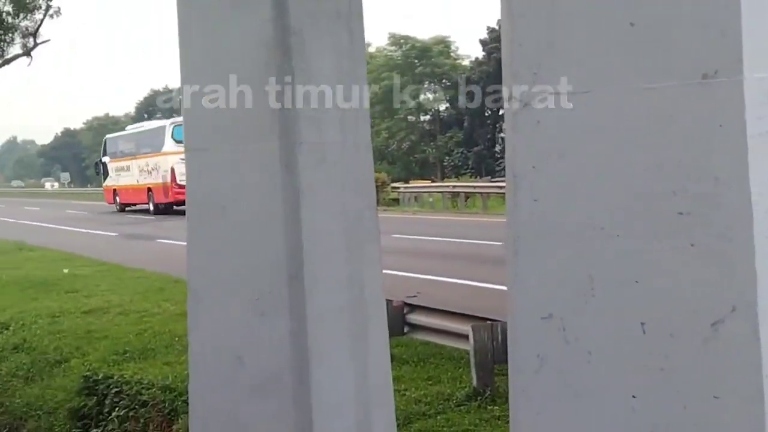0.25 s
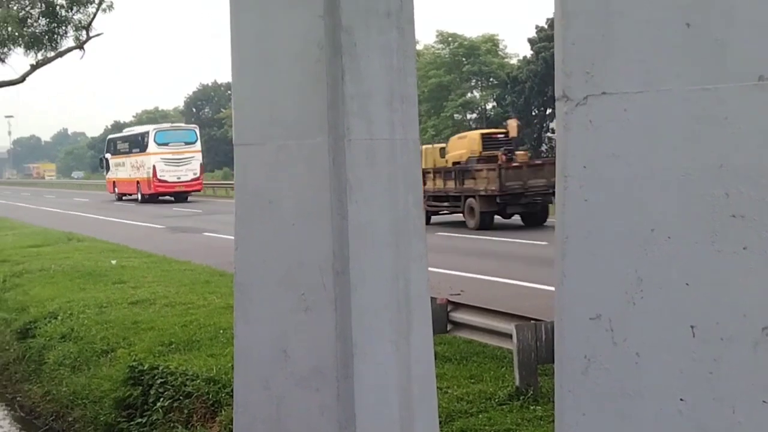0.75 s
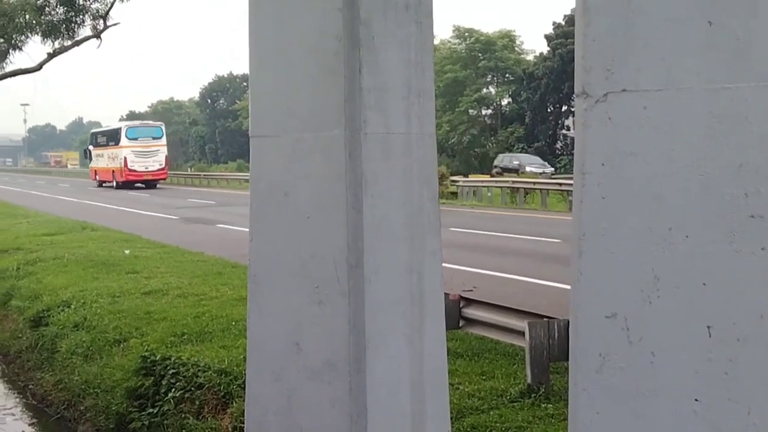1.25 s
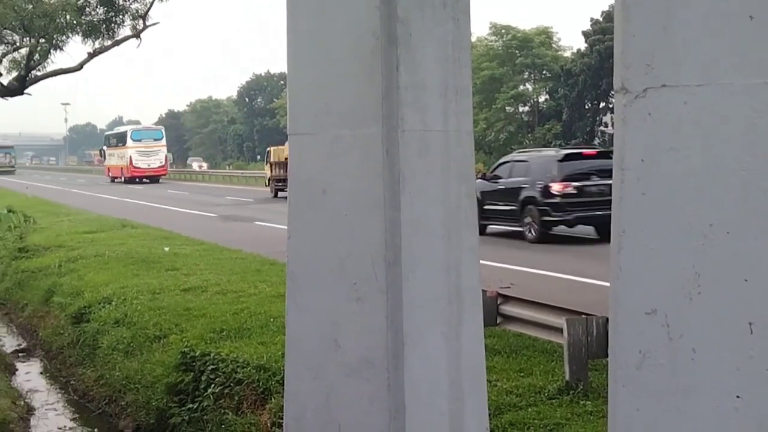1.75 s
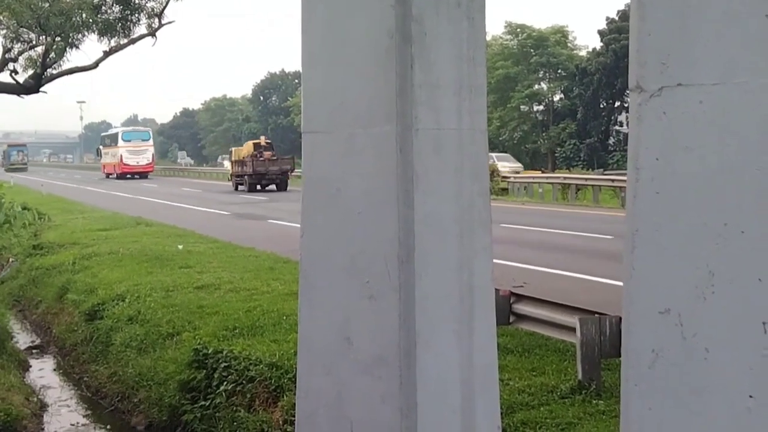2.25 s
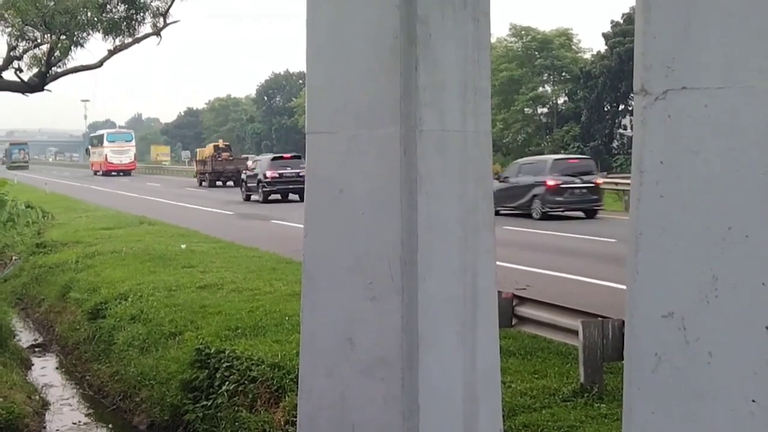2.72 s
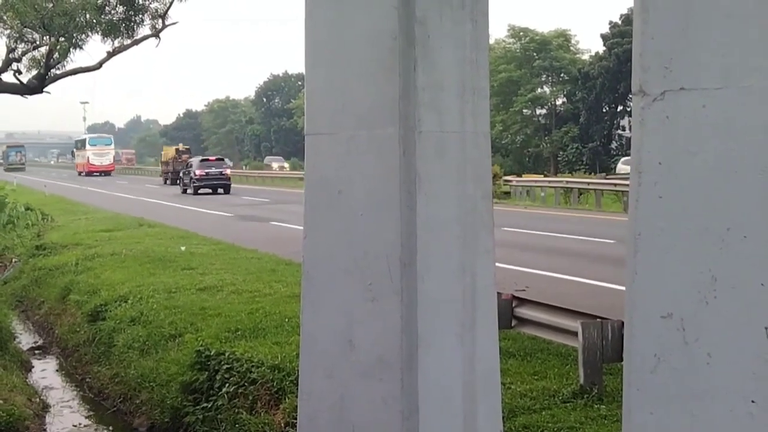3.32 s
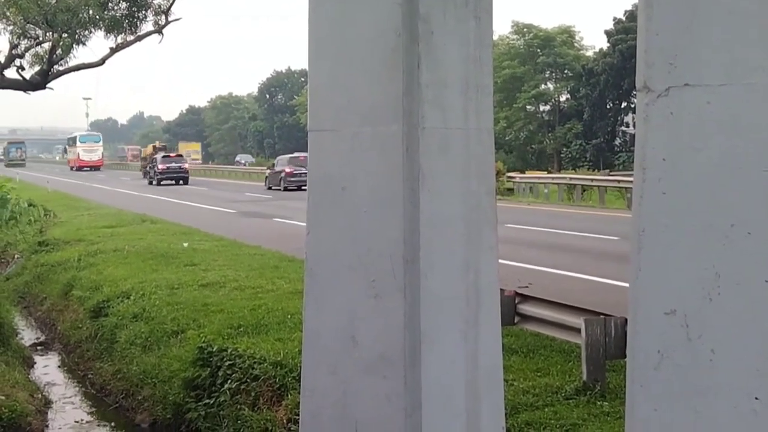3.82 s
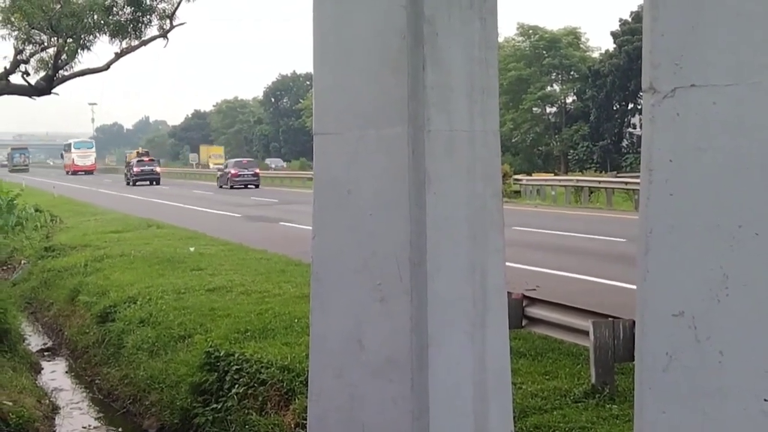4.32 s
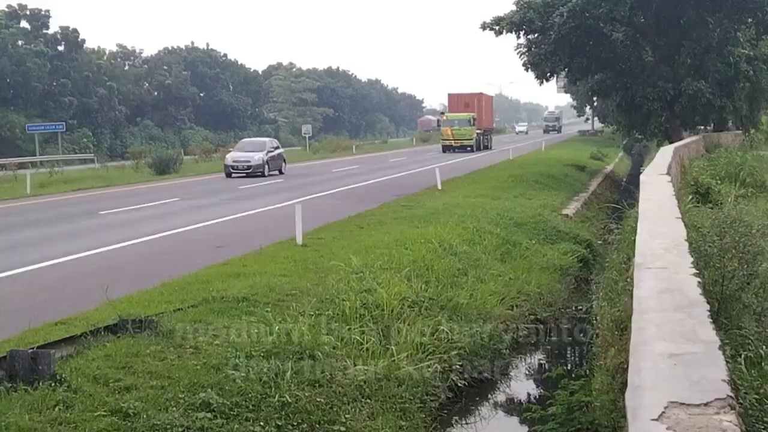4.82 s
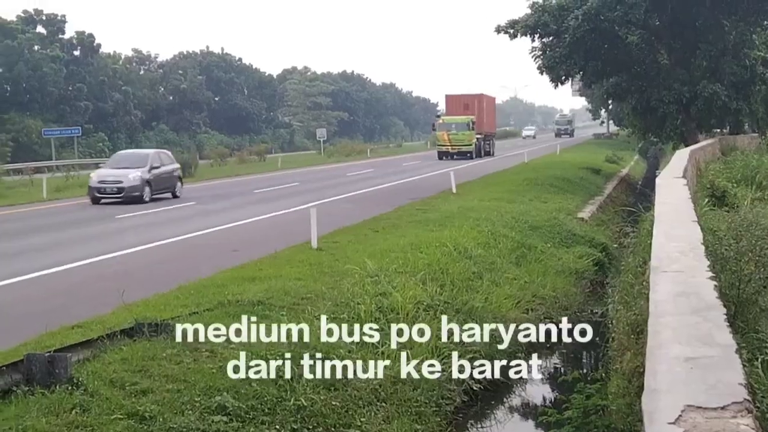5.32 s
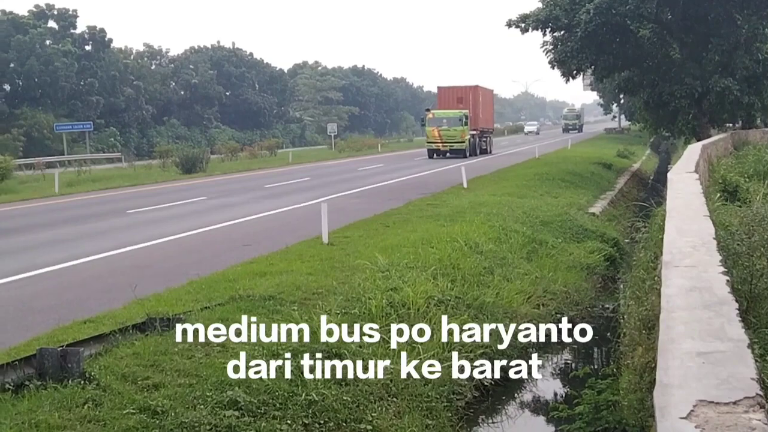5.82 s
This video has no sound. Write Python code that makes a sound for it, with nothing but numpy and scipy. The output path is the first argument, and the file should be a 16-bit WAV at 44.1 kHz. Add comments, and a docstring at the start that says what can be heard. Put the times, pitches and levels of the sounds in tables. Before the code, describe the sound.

Highway traffic sweeps by with tyre roar and falling whines, cuts off briefly, then returns as a car closes in.

```python
"""Traffic beside a busy toll road

A small diesel truck and two cars sweep past and draw away into the stream of traffic.
After a short silence, from a second spot on the verge, a car closes in ahead of more distant traffic.
Tyres roar and sing in whines that mostly sink as they pass, air hisses from the grooves,
engines and bodies rumble."""
import sys
import numpy as np
from scipy import signal
from scipy.fft import rfft, irfft
from scipy.io import wavfile
from scipy.ndimage import uniform_filter1d, map_coordinates

SR = 44100
rng = np.random.default_rng(int(sys.argv[2]) if len(sys.argv) > 2 else 0)


def store_wav(level_fs):
    """Save 16-bit WAV to argv[1]."""
    pcm = np.round(np.clip(np.atleast_2d(level_fs), -1, 1) * 32767)
    wavfile.write(sys.argv[1], SR, pcm.T.astype(np.int16))


N = 267687
TIME, FREQ = np.arange(N) / SR, np.maximum(np.fft.rfftfreq(N, 1 / SR), 1)
CUT_S, RESUME_S = 4.817, 5.06  # the silence between the two spots

# road noise close by, far off and closing in, and the finest hiss: (frequency [Hz], relative level [dB])
CLOSE_EQ = [(18, -54), (30, -25), (101, -7.5), (150, -8), (200, -7), (275, -9.5), (404, -7.5), (818, 0.5),
            (1070, -3.5), (1400, -0.5), (3040, -13), (4940, -15), (6150, -25), (7840, -25.5), (10000, -54),
            (13000, -80), (22000, -120)]
FAR_EQ = [(18, -56), (30, -18.5), (63, -5.5), (140, -0.5), (205, -1.5), (310, -6.5), (480, -9), (688, -3),
          (794, -3.3), (1490, -3), (3450, -16.5), (4610, -16.5), (6160, -26.5), (7830, -30.5), (8630, -35),
          (9500, -73), (12400, -90.5), (20900, -120)]
NEARING_EQ = [(30, -28.5), (72, -8.5), (150, -9), (215, -15), (290, -12.5), (490, -14.5), (780, -8.5),
              (1100, -7.5), (1400, -3.5), (2000, -8), (2600, -8.5), (4300, -24.5), (6300, -27),
              (7600, -37.5), (10000, -49.5), (14000, -60.5)]
SIZZLE_EQ = [(7000, -19.5), (8500, 8), (10500, -2.5), (12500, -2), (14000, -6), (16000, -7.5)]
# steady humps and dips in the hiss at the first spot: (centre [Hz], width [Hz], gain [dB])
HISS_BELLS = [(4240, 590, -2), (4680, 500, -0.5), (6250, 900, 0), (7900, 1600, 5)]
# the treble opening up at the second spot: (time [s], upper edge [Hz])
TREBLE_SWEEP = [(5.06, 5700), (5.15, 6400), (5.3, 6740), (5.78, 7300), (6.05, 9300)]
# diesels of a distant lorry and of the small truck: (time [s], firing rate [Hz], level [dB])
LORRY_ENGINE = [(2.9, 70, -61), (3.4, 68.5, -45), (3.8, 70, -52), (4.15, 73, -46.5), (4.8, 77, -49)]
TRUCK_ENGINE = [(0, 103.7, -44.5), (.25, 103.6, -37), (.5, 101.6, -46), (.7, 98.5, -54.5),
                (1.1, 99.05, -42), (1.9, 97.84, -35.5), (2.8, 91.64, -48.5), (4.8, 92.2, -60)]
# the bands of a thin shrill within the hiss: (centre [Hz], width [Hz], relative level [dB])
SHRILL_PEAKS = [(4500, 130, 0), (4690, 190, -2), (4930, 220, -4)]
# the course of that shrill: (time [s], pitch of the lowest band [Hz], level [dB])
SHRILL_COURSE = [(0, 4480, -58), (1.1, 4490, -47.5), (1.5, 4483, -45), (1.85, 4450, -46), (2.3, 4455, -52),
                 (2.6, 4470, -52.5), (3.05, 4570, -54), (3.6, 4430, -53), (4.0, 4520, -54),
                 (4.4, 4520, -54.5), (4.8, 4530, -55)]
# swelling bands of noise: tyre whines, hiss flares, a short thud and a thin shrill line:
# (time of peak [s], half length [s], centre [Hz], width [Hz], pitch swing [share], level [dB])
BAND_SWELLS = [(0.121, 0.27, 590, 172, 0.097, -31), (0.19, 0.15, 2700, 1290, 0.033, -33.5),
               (0.248, 0.17, 1350, 169, 0.026, -31), (0.46, 0.2, 1530, 270, 0.086, -27),
               (.67, .11, 1373, 341, .12, -25), (0.768, .09, 1090, 230, 0.13, -29),
               (0.819, 0.17, 2010, 490, 0.051, -32.5), (0.911, 0.17, 905, 210, .14, -26.5),
               (1.006, .025, 850, 149.7, .03, -23), (1.203, 0.14, 757, 90, .03, -29.5),
               (1.25, .28, 1260, 500, .06, -28), (1.392, 0.12, 7400, 1300, 0.019, -47.5),
               (1.483, 0.11, 3520, 500, 0.079, -41), (1.697, 0.2745, 868, 238, 0.013, -27.5),
               (1.827, 0.12, 4400, 90.4, 0.008, -46), (2.098, 0.26, 714, 160, 0.054, -35),
               (2.161, 0.175, 1320, 154.7, 0.022, -28), (2.325, 0.08, 2380, 603, 0.086, -36.5),
               (2.549, .1, 1420, 110, 0.021, -34.5), (3.198, 0.25, 1215, 159.8, 0.031, -42),
               (3.701, 0.8, 1390, 200, 0.005, -44.5), (4.106, .12, 1320, 194.5, 0.019, -41),
               (4.559, 0.31, 1545, 277.6, 0.021, -41), (4.597, 0.4, 5790, 750, 0.016, -56.5),
               (5.223, 0.16, 1370, 80, 0.01, -36.5), (5.653, .08, 1810, 95, 0.005, -32.5),
               (5.758, 0.13, 1340, 159, -0.0022, -29.5), (5.902, .18, 1860, 95, -0.021, -34),
               (5.992, .2, 1380, 168, -0.015, -29), (5.97, 0.26, 875, 280, 0.04, -33)]
# small truck, large car, small car, two on the far carriageway, the car closing in; each when nearest:
# (time [s], speed [m/s], lane distance [m], rumble [dB], roar [dB], hiss [dB])
PASS_BYS = [(0.07, 24, 12.6, -28.5, -24, -38), (1.32, 21, 12.8, -34.5, -27, -40),
            (2.11, 31.4, 12.8, -45, -35.5, -42), (3.1, 30, 22.5, -45, -38.5, -43.5),
            (4.48, 17, 36, -47, -48, -51), (6.52, 20.2, 21.3, -38, -27, -39)]
# the bed of distant traffic at each spot: (rumble [dB], roar [dB], hiss [dB])
FIRST_BED_DB, SECOND_BED_DB = (-44.5, -39, -48.5), (-46, -37, -49.5)


def undb(db):
    """Decibels to gain."""
    return 10 ** (np.asarray(db) / 20)


def unit(x):
    """Scale to rms 1."""
    return x / np.sqrt(np.mean(x ** 2))


def curves(table):
    """The columns of a timed table as automation curves, one value a sample."""
    s, *columns = np.transpose(table)
    return [np.interp(TIME, s, column) for column in columns]


def shaped(x, gain):
    """Filter by a gain for each frequency."""
    return irfft(rfft(x) * gain, N)


def noise(gain):
    """Fresh noise of a given colour, rms 1."""
    return unit(shaped(rng.standard_normal(N), gain))


def colour(points):
    """EQ curve through (frequency [Hz], level [dB]) points."""
    hz, db = np.transpose(points)
    return undb(np.interp(np.log(FREQ), np.log(hz), db))


def resonance(hz, width):
    """Gain of a steep resonance, 1 at its centre."""
    return 1 / (1 + ((FREQ - hz * hz / FREQ) / (1.28 * width)) ** 2)


def below(hz):
    """Smooth crossover: 1 in the lows, a half at hz, 0 in the highs."""
    return 1 / (1 + (FREQ / hz) ** 8)


def flutter(rate):
    """Random levels held 1 / rate s and slewed twice, rms 1."""
    size = int(SR / rate)
    held = np.repeat(rng.standard_normal(600)[:N // size + 1], size)
    return unit(uniform_filter1d(uniform_filter1d(held, size), size)[:N])


def bent(x, seconds):
    """Read a sound along a bent time axis, which bends its pitch."""
    return map_coordinates(x, [seconds * SR], order=3, mode="grid-wrap")


def distance_m(s, speed, lane):
    """Distance to a vehicle on a straight lane, nearest at time s."""
    return np.hypot(lane, speed * (TIME - s))


def shrill(waver=.007):
    """Narrow high bands that waver together in pitch and each swell and flutter on their own."""
    hz, db = curves(SHRILL_COURSE)
    bands = sum(noise(resonance(band_hz, width)) * undb(band_db + 2.5 * flutter(7))
                for band_hz, width, band_db in SHRILL_PEAKS)
    pitch_ratio = hz / SHRILL_PEAKS[0][0] * (1 + waver * flutter(8.7))
    return unit(bent(bands, np.cumsum(pitch_ratio) / SR)) * undb(db)


def sizzle(vehicles, trim_db=-4, reference_m=10.7, fade_db_per_m=3):
    """A fine top hiss that comes and goes while the vehicles are close."""
    power = 0
    for s, speed, lane, _, _, hiss_db in vehicles:
        fade_db = fade_db_per_m * (distance_m(s, speed, lane) - reference_m)
        power = power + undb(hiss_db + trim_db - fade_db) ** 2
    return noise(colour(SIZZLE_EQ)) * np.sqrt(power) * undb(1.74 * flutter(40) + .5 * flutter(8.3))


def bump(start_s=5.2865, hz=300, decay_s=.0014):
    """A bump gives one short dull thud."""
    age = np.maximum(TIME - start_s, 0)
    thud = np.sin(2 * np.pi * hz * age) * np.exp(-age / decay_s)
    return shaped(thud, resonance(hz, width=1500)) * undb(-15)


def diesel(table, pipe_hz, pipe_width_hz):
    """Uneven firings ring a truck's exhaust; the wake makes the note stagger."""
    hz, db = curves(table)
    cycles = np.cumsum(hz * (1 + .1 * flutter(45))) / SR
    firings = np.diff(np.floor(cycles), prepend=0) * undb(3.0 * flutter(80))
    return unit(shaped(firings, resonance(pipe_hz, pipe_width_hz))) * undb(db)


def band_swells(top_hz=8800, flutter_db=1.5):
    """Swelling, bending bands of noise: tyre whines, hiss flares, a short thud and a thin shrill line."""
    out = np.zeros(N)
    for s, half_s, hz, width, swing, db in BAND_SWELLS:
        away = np.hypot(1, (TIME - s) / half_s)  # 1 at the peak, growing on either side
        read_s = TIME - swing * half_s * away  # a positive swing sinks the pitch, as in a pass-by
        band = bent(noise(resonance(hz, width) * below(top_hz)), read_s)
        out += band * undb(db + flutter_db * flutter(35)) / away ** 2
    return out


def traffic_levels(vehicles, bed_db):
    """Rumble, roar and hiss in dB: each vehicle swells and fades with distance, over the steady bed."""
    falloff = np.array([1.044, 0.78, 2.05])[:, None]  # the hiss is beamed sideways and falls fastest
    power = undb(bed_db)[:, None] ** 2
    for s, speed, lane, *levels_db in vehicles:
        nearness = lane / distance_m(s, speed, lane)
        power = power + (undb(levels_db)[:, None] * nearness ** falloff) ** 2
    return 10 * np.log10(power)


def road_noise(eq, levels_db, trims_db):
    """Bodies rumble, tyres roar on coarse asphalt, grooves hiss; patches in the road make it flutter."""
    rumble_db, roar_db, hiss_db = levels_db + np.array(trims_db)[:, None]
    low, high = below(hz=390), 1 - below(hz=2873)
    surface_db = 0.59 * flutter(28.14) + 0.12 * flutter(7)
    rumble = noise(eq * np.sqrt(low)) * undb(rumble_db + 0.81 * flutter(19))
    roar = noise(eq * np.sqrt((1 - low) * (1 - high))) * undb(roar_db + surface_db)
    hiss = noise(eq * np.sqrt(high)) * undb(hiss_db + surface_db + 0.76 * flutter(60))
    return rumble + roar + hiss


def treble_opening(x, shelf_db=-16):
    """The hiss starts dull and brightens as its upper edge sweeps up."""
    hz, s, bins = signal.stft(x, SR, nperseg=512)
    edge_hz = np.interp(s, *np.transpose(TREBLE_SWEEP))
    passed = 1 / (1 + (hz[:, None] / edge_hz) ** 30)
    shelf = passed + (1 - passed) * undb(shelf_db)
    return signal.istft(bins * shelf, SR)[1][:N]


def nearing_traffic(vehicles, lag_s=0.00189):
    """A car closes in; the bounce off the verge comes back late and inverted and combs the roar."""
    bounce = .26 * below(hz=2900)
    comb = np.abs(1 - bounce * np.exp(-2j * np.pi * FREQ * lag_s))
    levels_db = traffic_levels(vehicles, SECOND_BED_DB)
    return road_noise(colour(NEARING_EQ) * comb, levels_db, trims_db=(-0.6, -0.1, -1.5))


def leaving_traffic(vehicles):
    """The close vehicles' bright noise gives way to the duller stream further down the road."""
    levels_db = traffic_levels(vehicles, FIRST_BED_DB)
    bells = undb(sum(db / (1 + (2 * (FREQ - hz) / width) ** 2) for hz, width, db in HISS_BELLS))
    close = road_noise(colour(CLOSE_EQ) * bells, levels_db, trims_db=(-0.1, -0.52, 0.33))
    far = road_noise(colour(FAR_EQ) * bells * below(hz=9450), levels_db, trims_db=(0.5, -0.3, -0.76))
    far_share = np.clip((TIME - 1.5) / 1.41, 0, 1)
    return close * np.sqrt(1 - far_share) + far * np.sqrt(far_share)


def scene(cut_length_s=0.0014, fade_length_s=0.28):
    """The first spot stops dead; the second fades in after a silence."""
    going = [row for row in PASS_BYS if row[0] < RESUME_S]
    coming = [row for row in PASS_BYS if row[0] >= RESUME_S]
    swells = band_swells()
    truck = diesel(TRUCK_ENGINE, pipe_hz=195, pipe_width_hz=100)
    lorry = diesel(LORRY_ENGINE, pipe_hz=108, pipe_width_hz=110)
    first_spot = leaving_traffic(going) + sizzle(going) + truck + lorry + shrill() + swells
    second_spot = treble_opening(nearing_traffic(coming) + bump() + swells)
    cut = np.clip((CUT_S - TIME) / cut_length_s, 0, 1)
    fade_in = np.clip((TIME - RESUME_S) / fade_length_s, 0, 1) ** 0.66
    return (first_spot * cut + second_spot * fade_in)[None]


def record(dry, top_hz=15450):
    """A steep low-pass takes the very top off the mix."""
    return signal.sosfilt(signal.ellip(10, .2, 80, top_hz, fs=SR, output="sos"), dry)


dry = scene()
out = record(dry)
store_wav(out)
```